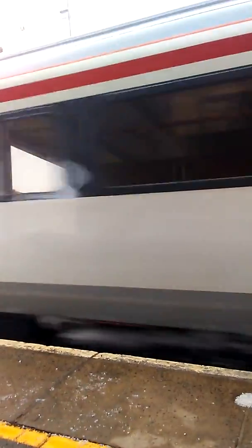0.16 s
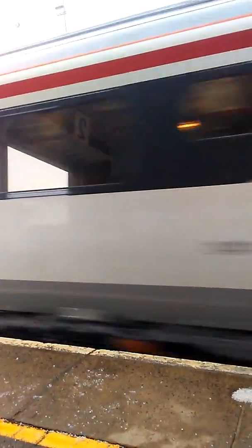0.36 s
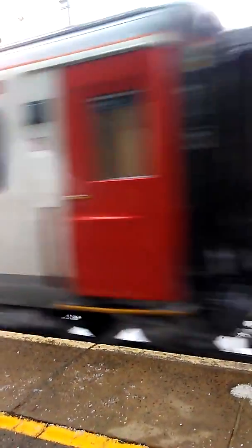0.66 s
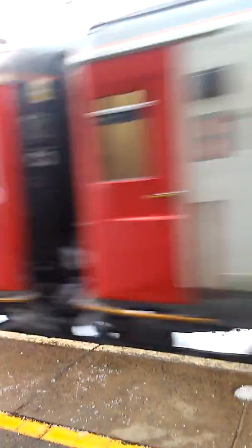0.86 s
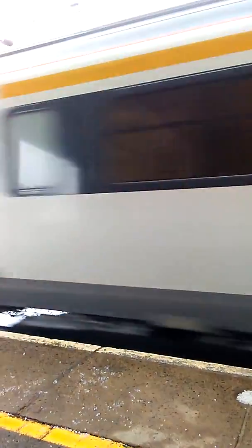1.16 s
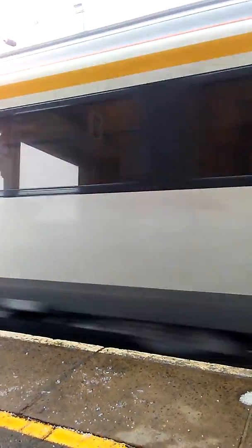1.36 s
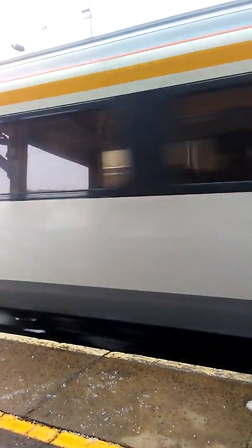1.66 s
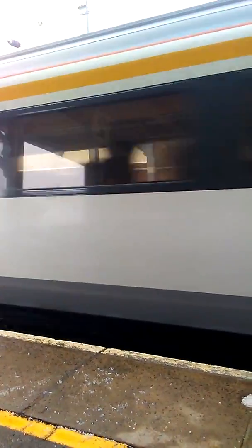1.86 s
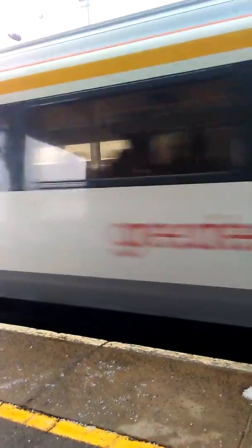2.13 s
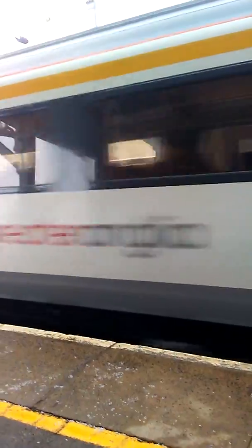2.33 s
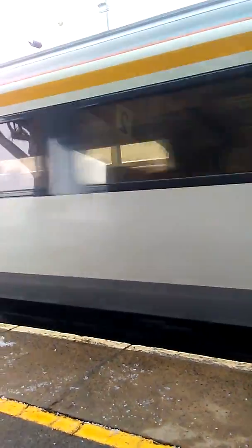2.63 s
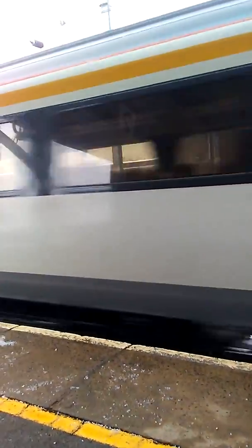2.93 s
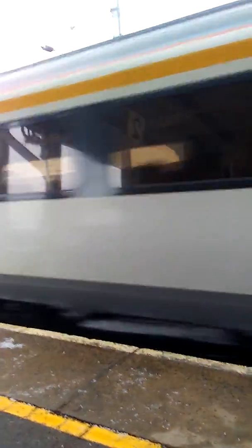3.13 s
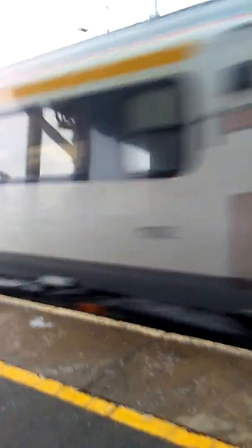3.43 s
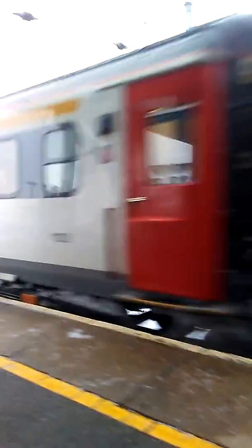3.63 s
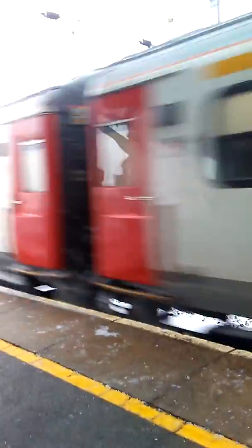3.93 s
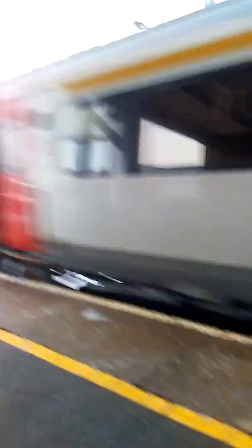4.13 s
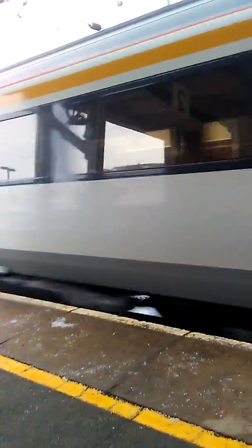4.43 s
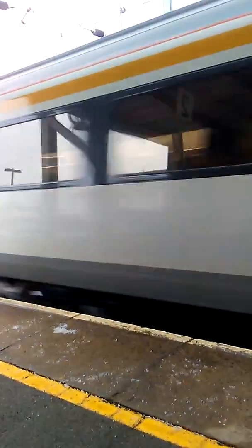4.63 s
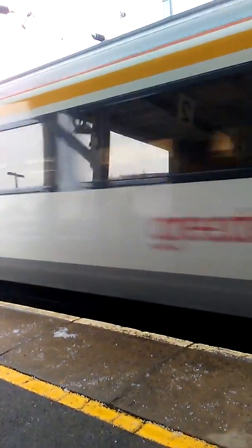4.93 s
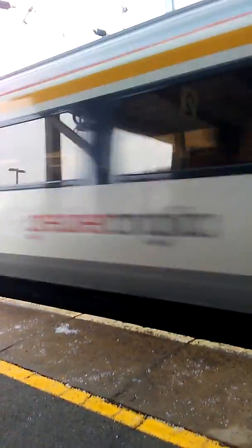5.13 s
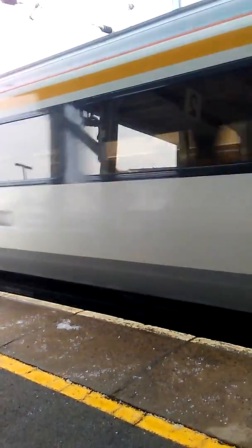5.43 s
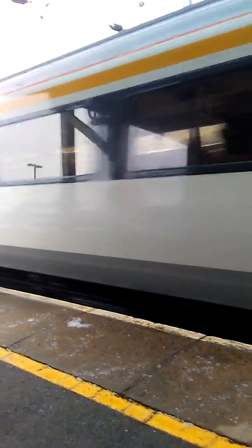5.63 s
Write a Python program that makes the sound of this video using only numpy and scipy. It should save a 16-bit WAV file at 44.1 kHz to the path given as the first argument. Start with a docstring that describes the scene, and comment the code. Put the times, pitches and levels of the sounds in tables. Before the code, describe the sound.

Passenger coaches roll by close to a platform. Low rumble and uneven dull bogie thuds lead at first, with a thin distant squeal. A bright air hiss rushes past around three seconds, then the rough, fluttering brake squeal climbs steadily to a piercing, near-constant scream with high ringing above. Outdoors, one small handheld microphone, mono, slightly strained at the loudest moments, abrupt end.

```python
"""A brake squeal swells as passenger coaches roll past a platform, heard by one small microphone.
Pads rub the wheels into a split pair of tones, higher wheel modes ring along, and bogies thud now and then.
Behind them rough wheels and rails rumble and roar, air leaks hiss by as shaped noise, and a coach body groans.
The sound has a gap from 4.3 to 4.9 kHz; the amplifier bends slightly and feeds a peak limiter."""
import sys
import numpy as np
from scipy import signal
from scipy.fft import rfft, irfft, next_fast_len
from scipy.io import wavfile
from scipy.ndimage import uniform_filter1d, minimum_filter1d

SR = 44100
rng = np.random.default_rng(int(sys.argv[2]) if len(sys.argv) > 2 else 0)


def boost(x):
    """Linear amplitude factor 10**(x/20) for a level x in decibels (scalar or array-like)."""
    u = np.asarray(x, float) / 20
    return 10 ** u


def waveform_to_disk(signal):
    """Save audio, clipped to [-1, 1], as 16-bit WAV at the path in sys.argv[1]."""
    frames = np.transpose(np.atleast_2d(signal))
    scaled = np.clip(frames, -1, 1) * 32767
    samples = np.round(scaled).astype(np.int16)
    wavfile.write(sys.argv[1], SR, samples)


N = 255339      # length in samples


def in_time(rows):
    """Columns of a curve over time, one value per sample."""
    s, *columns = np.transpose(rows)
    return [np.interp(np.arange(N) / SR, s, column) for column in columns]


def rms_one(x):
    """Scales to unit power."""
    return x / np.sqrt(np.mean(np.abs(x) ** 2) + 1e-20)


def colour(x, points):
    """Filters by an outline of (pitch_hz, level_db), joined along log frequency."""
    size = next_fast_len(N + SR // 4)
    log_hz = np.log(np.arange(size // 2 + 1) * SR / size + 1)
    point_hz, point_db = np.transpose(points)
    outline_db = np.interp(log_hz, np.log(point_hz), point_db)
    return irfft(rfft(x, size) * boost(outline_db), size)[:N]


def slow(x, width_hz):
    """Twice through a one-pole low-pass, at unit power; the first half second is run-in."""
    r = np.exp(-2 * np.pi * width_hz / SR)
    return rms_one(signal.lfilter([1], [1, -2 * r, r * r], x)[SR // 2:])


def drift(rate_hz):
    """Slow random wander with a spread of 1."""
    return slow(rng.standard_normal(N + SR // 2), rate_hz)


def noise(points, flicker_db, rate_hz):
    """Coloured noise of unit power whose level flickers."""
    coloured = colour(rng.standard_normal(N), points)
    return rms_one(coloured * boost(flicker_db * drift(rate_hz)))


def rubbed(hz, width_hz, steady=0.):
    """A mode driven by friction: its swing wanders in size and phase; steady modes hold their size."""
    count = N + SR // 2
    swing = slow(rng.standard_normal(count) + 1j * rng.standard_normal(count), width_hz * 0.54)
    size = uniform_filter1d(np.abs(swing), size=SR // 25)
    held = swing / size ** np.clip(steady, 0, 1)
    return rms_one(np.real(held * np.exp(2j * np.pi * hz * np.arange(N) / SR)))


def modes(table, flicker_db):
    """A set of narrow wandering tones at unit power, each fading in and out by itself."""
    return rms_one(sum(boost(db + flicker_db * drift(0.51)) * rubbed(hz, width) for hz, width, db in table))


def bump(s, half_s):
    """A bell-shaped swell of height 1 around a moment."""
    return np.exp(-((np.arange(N) / SR - s) / half_s) ** 2)


def swells(rows, floor_db=-90):
    """Gain of swells (centre_s, level_db, half_length_s) added to a floor."""
    return boost(floor_db) + sum(boost(db) * bump(s, half_s) for s, db, half_s in rows)


# The split pair of wheel modes, upper then lower: pitch_hz, width_hz
SQUEAL_PAIR = [(1883.3, 14.1), (1830, 22)]
# Weaker neighbours: pitch_hz, width_hz, level_db (against the pair)
SQUEAL_NEIGHBOURS = [(1793, 36, -25), (1944, 56, -20), (1859, 19, -8.5), (1803, 13.6, -16),
                     (1891, 180, -19)]
# Brake force, heard as the squeal: time_s, upper_mode_db, lower_mode_db (against the upper),
# group_db (the modes near 6.5 kHz)
BRAKE_FORCE = [(0, -35, 1, -45.5), (.9, -28, -6.5, -40.5), (1.6, -30, -5, -40.5), (2.3, -29, 2.5, -43.5),
               (3.0, -23, -7.5, -35), (3.5, -20, -1, -34.5), (4.1, -13, -12, -29), (4.4, -13.5, -0.5, -26),
               (4.65, -8, -9, -26), (5.0, -8.5, -2.5, -21.5), (5.24, -13.5, 3.5, -22.5),
               (5.32, -2.5, -21, -24), (5.79, -4.5, -5, -20.5)]
# The pads catch (+) or let go (-) for a moment: centre_s, change_db, half_length_s
PAD_CATCHES = [(1.139, -13, 0.019), (1.6, 7, 0.023), (1.635, -7, 0.016), (1.938, -5, 0.024),
               (2.553, -2.5, 0.035), (2.69, 2, 0.014), (2.863, 8.5, 0.023), (3.029, -8, 0.01),
               (3.357, 6, 0.03), (3.532, -1.5, 0.019), (3.642, 8, 0.018), (3.775, 5.5, 0.033),
               (3.814, -17, 0.012), (4.193, 3.5, 0.041), (4.444, -10.5, 0.039), (4.496, 7.5, 0.014),
               (4.551, -5, 0.042), (4.768, -15, 0.012), (4.926, -11, 0.0075), (5.148, -11.5, 0.0096),
               (5.195, -14, 0.0094), (5.244, -12, 0.014), (5.496, -5, .015)]


def squeal():
    """Two close modes beat about 53 times a second, throb and flutter; neighbours follow their mean power."""
    even_db, loose_db = -3, -23      # upper-mode levels where the squeal is nearly even, fully unsteady
    flutter_db, flutter_hz = 2.45, 4.8
    throb_db, throb_hz, throb_width_hz = 2, 8.5, 3.87      # the pads grip and ease in an uneven beat
    upper_db, lower_db, _ = in_time(BRAKE_FORCE)
    looseness = np.clip((upper_db - even_db) / (loose_db - even_db), .25, 1)
    upper_db = upper_db + sum(db * bump(s, half_s) for s, db, half_s in PAD_CATCHES)
    pair_db = []
    for mode_db in (upper_db, upper_db + lower_db):
        flutter = flutter_db * drift(flutter_hz)
        throb = throb_db * rubbed(throb_hz, throb_width_hz, steady=0.48)
        pair_db.append(mode_db + looseness * (flutter + throb))
    pair = sum(boost(db) * rubbed(hz, width, steady=.72) for db, (hz, width) in zip(pair_db, SQUEAL_PAIR))
    mean_power = uniform_filter1d(sum(boost(2 * db) for db in pair_db), size=SR // 4)
    neighbours = sum(boost(db) * rubbed(hz, width) for hz, width, db in SQUEAL_NEIGHBOURS)
    return pair + np.sqrt(mean_power) * neighbours


def braked(full_force_db, share):
    """Gain of a layer that follows a share of the brake's slow swing, below its level at full force."""
    force_db = uniform_filter1d(in_time(BRAKE_FORCE)[0], size=SR // 2)
    return boost(full_force_db + share * (force_db - force_db.max()))


# Wheel modes near 6.5 kHz and one lower: pitch_hz, width_hz, level_db (relative)
RINGING_GROUP = [(6590, 50, -2), (6512, 112, -1.5), (6426, 90, -8), (6350, 81, -9.5), (6770, 110, -13),
                 (3680, 140, -24.5)]
# Wheel modes near 5 kHz: pitch_hz, width_hz, level_db (relative)
MIDDLE_MODES = [(5107, 86, -1), (4840, 84, -1)]
# High whine near 11 and 13 kHz, weaker above: pitch_hz, width_hz, level_db (relative)
UPPER_WHINE = [(12960, 18, -3), (12950, 300, -1), (11105, 12, -0.5), (14790, 20, -19.5), (15150, 200, -12)]
# High whine near 8.4 and 10.2 kHz, weaker above: pitch_hz, width_hz, level_db (relative)
LOWER_WHINE = [(8340, 15, -9), (8400, 200, 1.5), (10100, 30, 1.5), (10240, 220, 1), (11450, 120, -5.5),
               (15300, 250, -10.5)]
# Spells of whine with a brighter rub: centre_s, half_length_s, upper_whine_db, lower_whine_db, rub_db
WHINE_SPELLS = [(.05, .12, -52, -51, -54), (0.404, 0.11, -58, -55, -57), (.83, .12, -55, -55, -60),
                (1.295, 0.29, -57, -58, -54.5), (1.608, .18, -51.5, -53, -51), (2.35, 0.74, -62, -63, -52),
                (4.044, 0.096, -66, -46, -69), (4.367, 0.27, -61.5, -49.5, -72),
                (4.844, 0.13, -60, -44.5, -46.5), (5.02, 0.1, -58, -55, -49),
                (5.21, 0.11, -53.5, -44.5, -52), (5.5, 0.15, -59.5, -50.5, -53.5),
                (5.737, 0.13, -60, -45, -47)]


def ringing():
    """Higher wheel modes follow the brake; two sets of high whine come in spells."""
    upper_rows = [(s, upper_db, half_s) for s, half_s, upper_db, _, _ in WHINE_SPELLS]
    lower_rows = [(s, lower_db, half_s) for s, half_s, _, lower_db, _ in WHINE_SPELLS]
    upper = swells(upper_rows, floor_db=-68.5) * modes(UPPER_WHINE, flicker_db=0.0)
    lower = swells(lower_rows, floor_db=-65) * modes(LOWER_WHINE, flicker_db=1.5)
    group = boost(in_time(BRAKE_FORCE)[2] + 0.81 * drift(5.4)) * modes(RINGING_GROUP, flicker_db=.8)
    middle = braked(-37, share=0.63) * boost(0.5 * drift(2.7)) * modes(MIDDLE_MODES, flicker_db=1.5)
    thin_onset = np.clip((np.arange(N) / SR - 4.2) / .2, 0, 1)      # a steady thin tone sets in late
    thin = boost(-64) * thin_onset * rubbed(14118, 12, steady=.6)
    return group + middle + thin + upper + lower


# Bogie blows: start_s, level_db (relative)
BOGIE_THUDS = [(.052, 1), (.137, -9), (.202, -6), (.29, -17), (.42, -5), (.572, -10), (.645, -15),
               (.787, -7), (.99, -12), (1.135, -13), (1.165, -8), (1.195, -11), (1.885, -14), (4.549, -8),
               (4.62, -10), (5.092, -7)]
# Modes that each blow rings: pitch_hz, level_db (relative), t60_s (time to fall 60 dB)
BOGIE_MODES = [(218.8, 2, 0.15), (276.6, 3.5, 0.15), (358, -9.5, 0.32), (430, -13, 0.13)]


def thuds():
    """Each blow is a soft push that rings the bogie modes with strengths of its own."""
    own_strengths_db = rng.normal(0, 1.5, (len(BOGIE_THUDS), len(BOGIE_MODES)))
    out = np.zeros(N + SR)
    t = np.arange(SR // 4) / SR
    rise = 1 - np.exp(-t / .003)      # 3 ms
    for (start_s, blow_db), own_db in zip(BOGIE_THUDS, own_strengths_db):
        for (hz, mode_db, t60), extra_db in zip(BOGIE_MODES, own_db):
            at = int(start_s * SR)
            decay = boost(blow_db + mode_db + extra_db - 7.5 - 60 * t / t60)
            out[at:at + len(t)] += decay * rise * np.sin(2 * np.pi * hz * t)
    return signal.sosfilt(signal.butter(2, 130, "high", fs=SR, output="sos"), out[:N])


# Bogie rumble outline: pitch_hz, level_db (per Hz, relative)
RUMBLE_OUTLINE = [(65, -45), (110, -24), (129, -26), (184, -2.5), (238, -2), (349, -0.5), (386, -3),
                  (417, -4), (772, -13.5), (1600, -21), (2080, -62.5), (3520, -120)]
# Ground shake outline: pitch_hz, level_db (per Hz, relative)
SHAKE_OUTLINE = [(20, -39.5), (40, -26), (65, 2), (100, -4.5), (125, -12.5), (200, -49.5)]
# Rail roar outline: pitch_hz, level_db (per Hz, relative)
ROAR_OUTLINE = [(500, -21), (900, -6), (1600, 7.5), (2300, 2.5), (3000, 4), (3400, 1.5), (3800, 3.5),
                (4200, -2.5), (6000, -48), (8000, -11.5), (11000, -26), (15600, -30)]
# The ground shakes under an axle: centre_s, level_db, half_length_s
GROUND_HEAVES = [(.64, -46, 0.065), (1.15, -39, 0.16), (2.48, -51, 0.033), (4.6, -38, 0.38),
                 (5.2, -41, 0.18), (5.72, -40, 0.19)]
# The rail roar swells as a coach end nears: centre_s, level_db, half_length_s
ROAR_RUSHES = [(.1, -37, 0.59), (3.15, -34, 0.41), (3.8, -45, .3), (5.79, -32, 0.18)]


def rolling():
    """Rough wheels on rough rails: rumble in the bogies, shake in the ground, roar from the rail."""
    rumble = braked(-19.5, share=0.21) * noise(RUMBLE_OUTLINE, flicker_db=1.0, rate_hz=2.3)
    shake = swells(GROUND_HEAVES, floor_db=-48.5) * noise(SHAKE_OUTLINE, flicker_db=3.0, rate_hz=6.4)
    rush_gain = swells(ROAR_RUSHES)
    rasp = boost(-2.5) * rush_gain * rubbed(3600, 600)      # an extra bright band when close
    roar_gain = np.hypot(braked(-33, share=0.19), rush_gain)
    roar = roar_gain * noise(ROAR_OUTLINE, flicker_db=0.85, rate_hz=21)
    return rumble + shake + rasp + roar


# Air leaks passing the microphone: nearest_s, level_db, rise_db_per_s, fall_db_per_s,
# top_db (band above 11.5 kHz, against the hiss)
AIR_LEAKS = [(-.1, -46.5, 40, 16.5, -20), (2.921, -30.5, 51, 20, -4), (3.4, -46, 14, 22, -13.5),
             (3.9, -39.5, 28, 67, -27)]


def leak_gains():
    """Each leak rises to its nearest point and falls away, steadily in dB."""
    t = np.arange(N) / SR
    gains = []
    for s, db, rise, fall, _ in AIR_LEAKS:
        drop_db = np.where(t < s, rise * (s - t), fall * (t - s))
        gains.append(boost(db - drop_db))
    return gains


# Jet outline: pitch_hz, level_db (per Hz, relative)
HISS_OUTLINE = [(3120, -44), (5300, -8.5), (5400, -16.5), (5980, -6), (6370, -1), (7460, 4), (8340, 3.5),
                (11200, -5.5), (13100, -16), (15500, -13)]
# A swish in the jet swells: centre_s, level_db, half_length_s
JET_SWISHES = [(2.4, -52, 0.12), (2.93, -28.5, 0.19), (3.33, -34, 0.11), (3.7, -40, .1), (3.92, -38, 0.13)]
# The swish slides in pitch: time_s, pitch_hz
SWISH_PITCH = [(2.2, 8330), (2.75, 8150), (3.14, 8400), (3.2, 7100), (3.42, 7650), (3.58, 7050),
               (3.8, 8600), (3.92, 8200), (4.05, 7600), (4.25, 7300)]


def air():
    """Smooth bright jets over the steady rub of the pads; the coach shades their top band for a while."""
    leaks, t = leak_gains(), np.arange(N) / SR
    spells = swells([(s, rub_db, half_s) for s, half_s, _, _, rub_db in WHINE_SPELLS])
    rub = braked(-57, share=.25)
    shade_db = -15 * np.clip((2.67 - t) / .06, 0, 1)      # uncovered at 2.67 s
    shade_db = shade_db * (t > 1)      # the first leak has gone by then
    leak_top = sum(gain * boost(row[4]) for gain, row in zip(leaks, AIR_LEAKS))
    top_gain = boost(shade_db) * leak_top + boost(-13.5) * spells + boost(-20) * rub
    jet = noise(HISS_OUTLINE, flicker_db=.5, rate_hz=20)
    top = signal.sosfilt(signal.butter(3, 11500, "high", fs=SR, output="sos"), jet)
    body = signal.sosfilt(signal.butter(3, 11500, "low", fs=SR, output="sos"), jet)
    top = boost(5.5 + 1.2 * drift(12)) * rms_one(top)
    swish_phase = 2 * np.pi * np.cumsum(in_time(SWISH_PITCH)[0]) / SR
    swish = drift(260) * np.cos(swish_phase)
    hollow = boost(-12.0) * rubbed(3650, 450)      # the jet blows across a hollow under the floor
    body_gain = sum(leaks) + spells + rub
    return body_gain * (body + hollow) + top_gain * top + swells(JET_SWISHES) * swish


# A hum near 200 Hz swells twice: centre_s, level_db, half_length_s
BODY_GROANS = [(3.36, -27, 0.073), (3.76, -26, 0.088)]


def groan():
    """One low mode of the coach body, with a broad drone about an octave below around both swells."""
    hum = swells(BODY_GROANS) * rubbed(199, 3.2, steady=0.97)
    drone = swells([(3.55, -45, 0.44)]) * rubbed(98, 14)
    return hum + drone


def scene():
    """All sources reach one microphone."""
    return (squeal() + ringing() + thuds() + rolling() + air() + groan())[None]


def low_pass(x):
    """Removes everything above the highest recorded frequency."""
    return signal.sosfilt(signal.butter(12, 15660, fs=SR, output="sos"), x)


# Outline of the gap from 4.3 to 4.9 kHz: pitch_hz, level_db
GAP_OUTLINE = [(3950, 0), (4100, -5.5), (4270, -4.5), (4320, -41.5), (4850, -34), (4930, -4.5), (5100, 0)]


def record(dry):
    """A gap in the spectrum, a slightly bent amplifier, then a look-ahead limiter that holds peaks down."""
    ceiling, release_s, fade_s = .96, 0.018, .003
    x = colour(dry[0], GAP_OUTLINE)
    # a loud squeal bends the amplifier: sum and difference tones
    x = x + 0.012 * signal.lfilter([1, -1], [1, -.9], x ** 2)
    needed_gain = np.minimum(1, ceiling / (np.abs(x) + 1e-9))
    gain = minimum_filter1d(needed_gain, size=SR // 1200)
    recovery = np.arange(N) / (SR * release_s)      # the log gain recovers at a fixed rate
    gain = np.exp(np.minimum.accumulate(np.log(gain) - recovery) + recovery)
    gain = uniform_filter1d(gain, size=SR // 2500)
    fade_out = np.minimum(1, np.arange(N)[::-1] / (fade_s * SR))
    mix = x * gain * fade_out
    return low_pass(mix)


dry = scene()
out = record(dry)
waveform_to_disk(out)
```